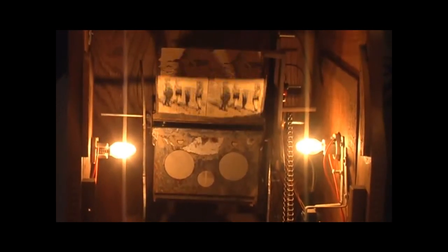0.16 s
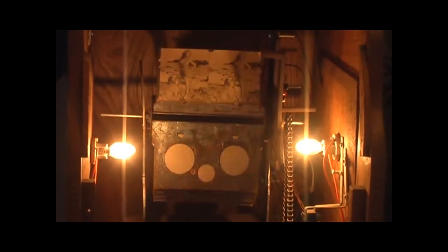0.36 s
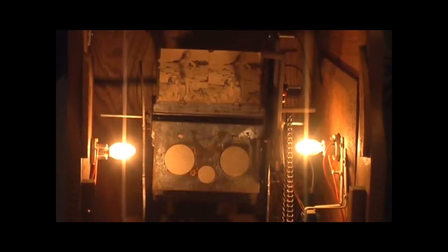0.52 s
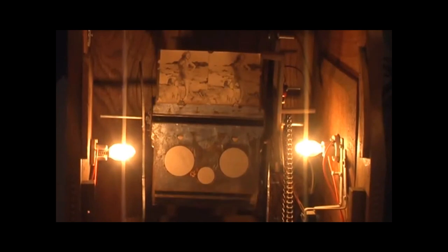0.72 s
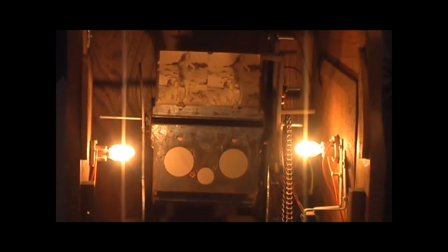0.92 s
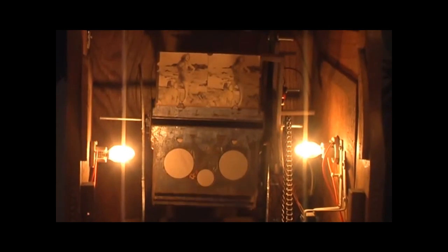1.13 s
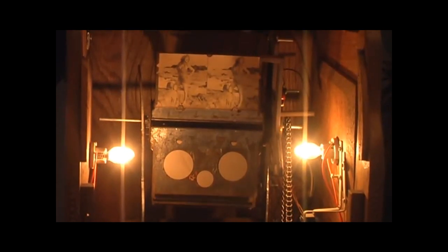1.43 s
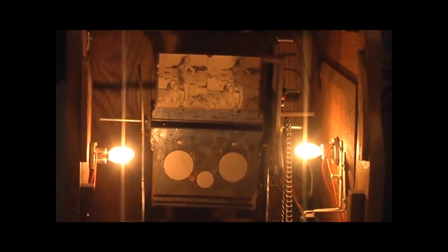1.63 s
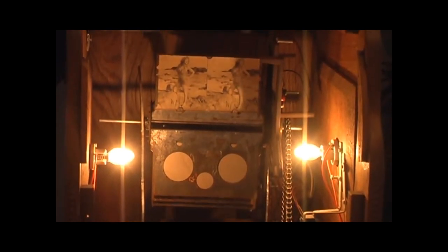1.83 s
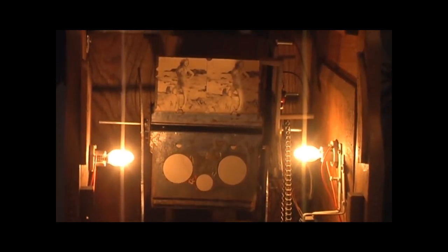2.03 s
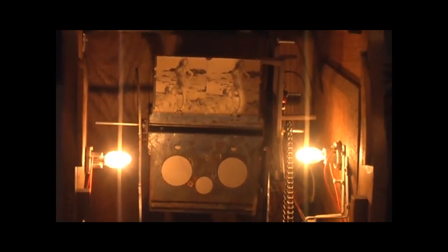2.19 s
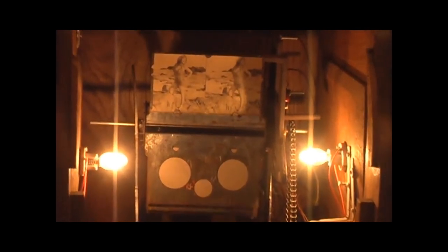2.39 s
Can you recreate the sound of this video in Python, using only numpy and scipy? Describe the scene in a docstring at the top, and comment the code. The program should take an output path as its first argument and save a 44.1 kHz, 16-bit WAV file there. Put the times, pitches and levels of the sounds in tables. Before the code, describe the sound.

A sharp wooden-metallic clack as a card frame drops, over a whirring, rattling small motor

```python
"""A small motor inside an old card-viewing cabinet hums and drives a gear train that whines and rattles:
sines at mains and tooth-contact rates, with coloured noise for the case's drone and the rattle.
A card frame slips free, slams down with a clack, bounces and settles: bursts of noise excite decaying
modes, and the wooden case rings briefly through a sparse random reverberation.
The card stack adds a low rumble of filtered noise."""
import sys
import numpy as np
from scipy import signal
from scipy.fft import rfft, irfft, next_fast_len
from scipy.io import wavfile
from scipy.ndimage import uniform_filter1d

SR = 44100
rng = np.random.default_rng(int(sys.argv[2]) if len(sys.argv) > 2 else 0)


def log_audio(samples):
    """Write samples as a 16-bit WAV file to the path given in sys.argv[1]."""
    # one column per channel
    frames = np.atleast_2d(samples).T
    # limit to full scale, then quantise
    limited = np.clip(frames, -1, 1)
    pcm = np.round(limited * 32767).astype(np.int16)
    wavfile.write(sys.argv[1], SR, pcm)


N = 112454  # length in samples

# Mains hum of the motor, before the metal parts resonate: pitch_hz [Hz], level_db [dB]
HUM_LINES = [(120, -70.5), (240, -71), (360, -82)]
# Gear whine, before the metal parts resonate: multiple of the wheel's turning rate [1]: level_db [dB]
TOOTH_LINES = {69: -61, 72: -57.5, 75: -68, 78: -63.5, 79: -55.5, 82: -54.5, 84: -54.5, 85: -63.5}
WHEEL_HZ = 7.56
WAVER_DB, WAVER_RAD = 3, 0.79
STEADY_TOOTH, STEADY_SHARE = 72, 0.3  # this multiple has only a share of the phase waver

# Spectrum of the case's steady drone: frequency_hz [Hz], gain_db [dB, relative]
DRONE_COLOUR = [(18, -74), (30, -37), (86, -34), (113, -27.5), (148, -21.5), (233, -18.5), (497, -10),
                (529, -6.5), (610, 2), (681, -8.5), (863, -13.5), (919, -22.5), (1300, -17), (1690, -56),
                (2860, -120)]
DRONE_DB = -50.5
THROB_HZ, THROB_DB = 30.05, 2

# Spectrum of the rattling drive: frequency_hz [Hz], gain_db [dB, relative]
RATTLE_COLOUR = [(500, -80), (900, -27), (1300, -22), (1500, -14), (1900, -14.5), (2500, -17.5),
                 (3300, -20), (4400, -15.5), (4850, -23.5), (5440, -28.5), (6400, -20.5), (7270, -12),
                 (7900, -13), (8510, -16.5), (9200, -36), (9700, -129), (10300, -41), (11100, -32.5),
                 (14400, -31), (15200, -41)]
RATTLE_DB, PATCH_DB = -48, 1.5
CHATTER_HZ, CHATTER_DB = 43.5, 1.1
FLICKER_DB, GRAIN_DB = 1.23, 1
# Swells of the rattle as the drive binds, about ten a second:
# centre_s [s], treble_swell_db [dB], lower_swell_db [dB], fall_s [s, Gaussian width]
BINDING_SWELLS = [(0.039, 6.5, 3, 0.015), (.15, 5, 3.5, 0.0093), (0.207, 7.5, 3, 0.018),
                  (0.236, 7.5, 6, 0.025), (0.329, 9.5, 6.5, 0.027), (0.439, 11.5, 10, 0.021),
                  (0.632, 5.5, 5.5, 0.014), (0.755, 6, 6, 0.016), (0.834, 11, 9.5, 0.028),
                  (0.943, 10, 9, 0.021), (1.048, 7, 7.5, 0.015), (1.136, 11, 10, 0.012),
                  (1.247, 9, 3.5, 0.013), (1.344, 10.5, 8.5, 0.02), (1.438, 4, 0, 0.0038),
                  (1.523, 6.5, 5, 0.0078), (1.572, 6.5, -3, 0.0045), (1.64, 10.5, 5.5, 0.021),
                  (1.735, 10, 6, 0.016), (1.834, 9, 10, .022), (1.944, 9, 9, 0.02), (2.033, 13, 8, 0.01),
                  (2.135, 10, 10.5, 0.019), (2.237, 11.5, 11.5, .018), (2.34, 6, 4.5, 0.029),
                  (2.434, 10, 5, 0.0089), (2.49, 3, 3, 0.01)]
RISE_S = 0.0028  # Gaussian width
TOP_SWELL = 1.45  # multiplies the treble swell in the highest band
NOTCH_AFTER_S, NOTCH_S, NOTCH_SHARE = 0.0059, 0.0076, 0.32  # brief dip in each swell

# Resonances of the metal parts: centre_hz [Hz], width_hz [Hz], lift_db [dB]
PART_RESONANCES = [(416, 16.3, 5.5), (720, 12, 4), (792, 19, 7), (854, 18, 6.5), (1450, 14.6, 9.5),
                   (1665, 25, 7.5), (1993, 13, 10.5), (2460, 23, 11), (2973, 11.5, 10.5), (4380, 170, 2.5),
                   (4816, 143, 11.5), (6600, 33, 9.5), (7015, 117, 6.5), (7280, 170, 9), (7263, 51, -1),
                   (7900, 155, 4), (9100, 58, -5)]

# Noise bursts of the clack and its bounces, with a faint soft burst just before the loudest:
# start_s [s], level_db [dB, relative], sharpness_db [dB, of the crack], t60_s [s, of the burst],
# pitch_hz [Hz, of the knock]
CLACK_BURSTS = [(0.409, -44.5, -16, 0.077, 1136), (0.457, -42.5, -17, 0.19, 964),
                (0.4766, -39, -3, 0.022, 2040), (0.4840, -27.5, 2.5, 0.013, 3070),
                (0.4850, -29.5, 8, 0.017, 1972), (0.4876, -31, 7, 0.019, 1450),
                (0.4882, -25, 2, 0.014, 3650), (0.4909, -33, -1, 0.027, 1317),
                (0.4982, -28, 1, 0.029, 2212), (.4993, -34, -10, 0.014, 1160), (0.5, -31.5, 6, 0.015, 3700),
                (0.5059, -38, 2, 0.027, 1955), (.512, -37, -2, 0.013, 1860),
                (0.517, -31.5, -6, 0.024, 1095), (.531, -38.5, -8, 0.052, 700),
                (.540, -40.5, 7, 0.036, 1890), (.549, -36.5, -5, 0.027, 1080),
                (.560, -33.5, -3, 0.011, 1090), (0.577, -48, -15, 0.04, 1060),
                (0.597, -55, -12, 0.023, 1090), (0.7540, -48.5, -6, 0.039, 1600),
                (.758, -42.5, -14, 0.067, 1114), (.7545, -47, -2, 0.044, 3196),
                (.761, -48, -1, 0.032, 4260), (.783, -44, -2, 0.03, 2530), (0.788, -42.5, -11, 0.061, 1050)]
SPIKY_DB, RISE_SHARE = 2.5, 0.025  # unevenness of a burst; rise as a share of t60
# Spectrum of the crack: frequency_hz [Hz], gain_db [dB]
CRACK_COLOUR = [(60, -50), (100, -62), (430, -33), (990, -28), (1420, -7), (1870, -7), (2250, -7),
                (2860, -17), (3690, -6.5), (5770, -6.5), (8000, -9), (15000, -17)]
CRACK_DB = 12
KNOCK_DB, KNOCK_BLUR, KNOCK_FOLLOWS_SHARPNESS = 10, 0.3, 0.4
# A fading shiver of noise joins the cracks, then stops
SHIVER_S, SHIVER_END_S, SHIVER_STOP_S = 0.486, 0.55, 0.0072
SHIVER_DB, SHIVER_T60_S, SHIVER_FLICKER_DB = -30.5, 0.23, 2.9
# Modes of frame and case: pitch_hz [Hz], level_db [dB, relative], t60_s [s]
FRAME_MODES = [(182, -3, 0.13), (427.7, -1.5, 0.066), (558, -15.5, 0.062), (774, -14, 0.097),
               (920, -25, 0.05), (957, -6.5, 0.12), (1088, -2, 0.087), (1123, -6, 0.069), (1197, -9, 0.05),
               (1500, -15, 0.041), (1730, -20, 0.035), (1945, -20, 0.079), (2122, -15.5, 0.048),
               (2216, -4.5, 0.06), (2367, -8.5, 0.054), (3376, -5, 0.037), (3650, -5, 0.015),
               (4100, -2, 0.016)]
MODE_SPLIT_HZ, LOW_RING_DB, HIGH_RING_DB = 1300, -22.5, -24.5
BASS_CUT_HZ = 340

# Reverberation inside the cabinet: frequency_hz [Hz], t60_s [s]
CABINET_DECAY = [(150, 0.83), (500, 0.54), (1500, 0.35), (4000, 0.38), (12000, 0.13)]
CABINET_DB = -7.5

# Rumble of the card stack shifting: time_s [s], level_db [dB]
STACK_SHIFT = [(0.55, -55), (0.642, -69), (0.752, -83), (0.786, -55), (1.042, -68), (1.056, -58),
               (1.1, -78)]

# Left-right difference against the middle, steady sound: frequency_hz [Hz], gain_db [dB]
STEADY_WIDTH = [(60, -13), (130, -12), (290, -7), (640, -21.5), (1410, -13), (3100, -17.5), (4800, -23.5),
                (5300, -43), (15000, -60)]
# Left-right difference against the middle, clack: frequency_hz [Hz], gain_db [dB]
CLACK_WIDTH = [(60, -33), (200, -20), (700, -19), (1300, -19), (2400, -16), (4400, -11), (4900, -44),
               (15000, -43)]
EDGE_HZ = 15200


def amp(db):
    """Level law: 20 dB is a factor of ten in amplitude."""
    return 10 ** (np.asarray(db, float) / 20)


def evened(x):
    """Normalization to an rms of 1."""
    return x / np.sqrt(np.mean(x ** 2) + 1e-20)


def colour(x, points):
    """Linear filtering: a spectrum in dB, interpolated on a log-frequency axis."""
    size = next_fast_len(x.shape[-1] + 4096)
    f, db = np.transpose(points)
    hz = np.fft.rfftfreq(size, 1 / SR)
    gain = amp(np.interp(np.log(hz + 1), np.log(f + 1), db))
    return irfft(rfft(x, size) * gain, size)[..., :x.shape[-1]]


def wander(rate_hz):
    """Random fluctuation: noise smoothed twice by a moving average, at rms 1."""
    size = max(int(SR / rate_hz / 2), 1)
    once = uniform_filter1d(rng.standard_normal(N), size=size)
    return evened(uniform_filter1d(once, size=size))


def patchy(depth_db):
    """Nonstationary noise: the level drifts in patches of time and pitch."""
    z = signal.stft(rng.standard_normal(N), nperseg=256)[2]
    across_pitch = uniform_filter1d(rng.standard_normal(z.shape), size=4, axis=0)
    patches = evened(uniform_filter1d(across_pitch, size=8, axis=1))
    return signal.istft(z * amp(depth_db * patches), nperseg=256)[1][:N]


def motor():
    """Periodic forcing: mains hum and wavering gear-tooth lines, over the throbbing drone of the case."""
    t = np.arange(N) / SR
    lines = np.zeros(N)
    for hz, db in HUM_LINES:
        lines += amp(db + 0.5 * wander(8.3)) * np.sin(2 * np.pi * (hz * t + rng.random()))
    for multiple, db in TOOTH_LINES.items():
        level = amp(db + WAVER_DB * wander(6.9))
        share = STEADY_SHARE if multiple == STEADY_TOOTH else 1
        turns = multiple * WHEEL_HZ * t + rng.random()
        lines += level * np.sin(2 * np.pi * turns + WAVER_RAD * share * wander(4.64))
    throb = amp(THROB_DB * np.sin(2 * np.pi * THROB_HZ * t + 3.0))
    drone = evened(colour(rng.standard_normal(N) * throb, DRONE_COLOUR))
    return np.sqrt(2) * lines + amp(DRONE_DB) * drone  # sqrt(2): line levels are rms


def rattle():
    """Dense contact noise: tiny impacts swell as the drive binds, in general the treble most."""
    t = np.arange(N) / SR
    low_swell, treble_swell = np.zeros(N), np.zeros(N)
    for centre_s, treble_db, lower_db, fall_s in BINDING_SWELLS:
        since = t - centre_s
        bump = np.exp(-0.5 * (since / np.where(since < 0, RISE_S, fall_s)) ** 2)
        dip = 1 - NOTCH_SHARE * np.exp(-0.5 * ((since - NOTCH_AFTER_S) / NOTCH_S) ** 2)
        treble_swell += treble_db * bump * dip
        low_swell += lower_db * bump * dip

    chatter = CHATTER_DB * np.sin(2 * np.pi * CHATTER_HZ * t + 1.0)
    fine_db = chatter + FLICKER_DB * wander(60) + GRAIN_DB * wander(450)
    hiss = rfft(evened(colour(patchy(PATCH_DB) * amp(fine_db), RATTLE_COLOUR)))
    hz = np.fft.rfftfreq(N, 1 / SR)
    bands = [(0, 5400, low_swell), (5400, 9700, treble_swell), (9700, SR, TOP_SWELL * treble_swell)]
    swollen = sum(irfft(hiss * ((hz >= a) & (hz < b)), N) * amp(swell) for a, b, swell in bands)
    return amp(RATTLE_DB) * swollen


def ring_parts(x):
    """Resonance: Lorentzian curves in dB reshape narrow bands where the metal parts respond."""
    hz = np.fft.rfftfreq(N, 1 / SR)
    lift_db = sum(db / (1 + ((hz - f) / width * 2) ** 2) for f, width, db in PART_RESONANCES)
    return irfft(rfft(x) * amp(lift_db), N)


def shiver():
    """Exponential decay: flickering noise fades and is then gated off."""
    t = np.arange(N) / SR
    since = t - SHIVER_S
    gate = (since > 0) / (1 + np.exp(np.clip((t - SHIVER_END_S) / SHIVER_STOP_S, -50, 50)))
    level_db = SHIVER_DB - 60 * since / SHIVER_T60_S + SHIVER_FLICKER_DB * wander(160)
    return gate * amp(level_db) * rng.standard_normal(N)


def frame():
    """Modal excitation: noise bursts sound as cracks, with short knocks and ringing modes."""
    t = np.arange(int(0.2 * SR)) / SR
    cracks, pushes, knocks = np.zeros(N), np.zeros(N), np.zeros(N)

    def stepped():  # a new random value every 10 samples
        return np.repeat(rng.standard_normal(len(t) // 10), 10)

    for start_s, db, sharp_db, t60, knock_hz in CLACK_BURSTS:
        at = round(start_s * SR)
        span = slice(at, at + len(t))
        shape = amp(db - 60 * t / t60) * np.minimum(t / (RISE_SHARE * t60), 1)
        grains = shape * rng.standard_normal(len(t)) * amp(SPIKY_DB * stepped())
        burst = grains * np.linalg.norm(shape) / np.linalg.norm(grains)  # energy of the shape
        cracks[span] += amp(sharp_db) * burst
        pushes[span] += burst
        turns = np.cumsum(knock_hz / SR * (1 + KNOCK_BLUR * stepped()))
        knocks[span] += amp(KNOCK_FOLLOWS_SHARPNESS * sharp_db) * shape * np.sin(2 * np.pi * turns)
    cracks += shiver()

    low_modes, high_modes = np.zeros(len(t)), np.zeros(len(t))
    for hz, db, t60 in FRAME_MODES:
        modes = low_modes if hz < MODE_SPLIT_HZ else high_modes
        modes += amp(db - 60 * t / t60) * np.sin(2 * np.pi * hz * t)
    rings = amp(LOW_RING_DB) * signal.fftconvolve(pushes, low_modes)[:N]
    rings += amp(HIGH_RING_DB) * signal.fftconvolve(cracks, high_modes)[:N]
    clack = amp(CRACK_DB) * colour(cracks, CRACK_COLOUR) + rings + amp(KNOCK_DB) * knocks
    return signal.sosfilt(signal.butter(3, BASS_CUT_HZ, "high", fs=SR, output="sos"), clack)


def cabinet(x):
    """Reverberation: sparse random reflections, each frequency band dying at its own rate."""
    taps = rng.choice([-1., 1.], SR // 2) * (rng.random(SR // 2) < 0.06)
    hz, t, z = signal.stft(taps, SR, nperseg=256)
    f, t60 = np.transpose(CABINET_DECAY)
    band_t60 = np.interp(np.log(hz + 1), np.log(f), t60)[:, None]
    tail = signal.istft(z * amp(-60 * t / band_t60), SR, nperseg=256)[1]
    return signal.fftconvolve(x, tail / np.linalg.norm(tail))[:N]


def stack():
    """Friction noise: a low rumble follows the level curve of the cards sliding into place."""
    time_s, db = np.transpose(STACK_SHIFT)
    low = evened(colour(rng.standard_normal(N), [(90, -15), (150, 6.5), (300, 6.5), (450, -32)]))
    return low * amp(np.interp(np.arange(N) / SR, time_s, db, left=-100, right=-100))


def scramble(x, size):
    """Decorrelation: similar short-time magnitudes with random phases."""
    overlap = size * 3 // 4
    z = signal.stft(x, nperseg=size, noverlap=overlap)[2]
    z = abs(z) * np.exp(2j * np.pi * rng.random(z.shape))
    return 2 * signal.istft(z, nperseg=size, noverlap=overlap)[1][:N]


def scene():
    """Superposition: the machine in the middle, with a small decorrelated left-right difference."""
    steady = ring_parts(motor() + rattle())
    clack = frame()
    clack = clack + amp(CABINET_DB) * cabinet(clack)
    steady = steady + stack()
    side = colour(scramble(steady, size=2048), STEADY_WIDTH)
    side = side + colour(scramble(clack, size=128), CLACK_WIDTH)
    middle = steady + clack
    return np.array([middle + side, middle - side])


def record(dry):
    """Band limitation: a linear-phase low-pass filter removes the highest frequencies."""
    low_pass = signal.firwin(511, EDGE_HZ, window=("kaiser", 9), fs=SR)
    return signal.oaconvolve(dry, low_pass[None], "same")


dry = scene()
out = record(dry)
log_audio(out)
```